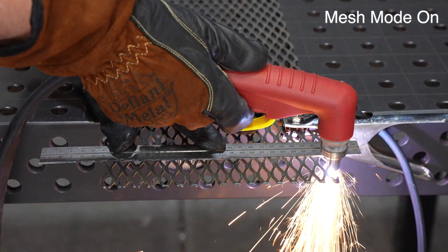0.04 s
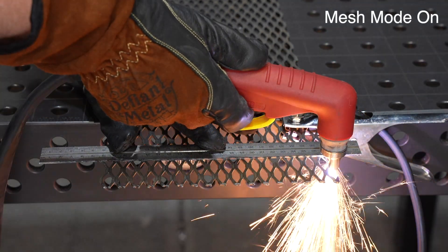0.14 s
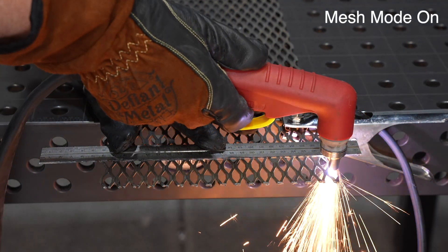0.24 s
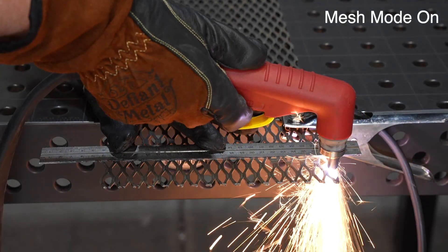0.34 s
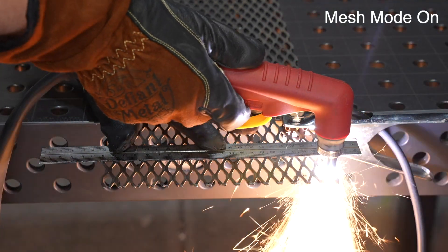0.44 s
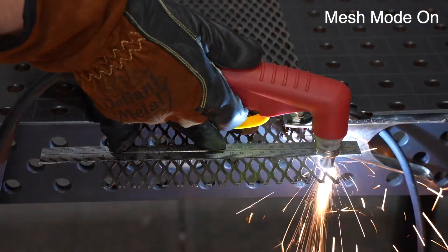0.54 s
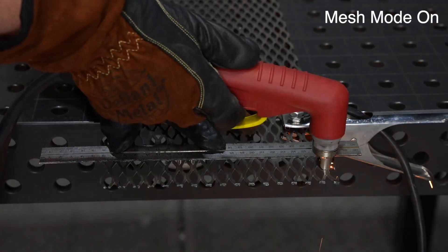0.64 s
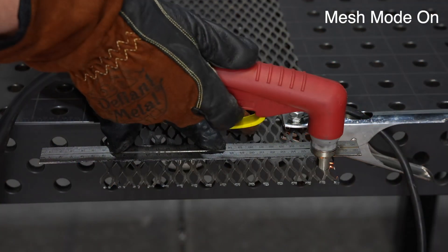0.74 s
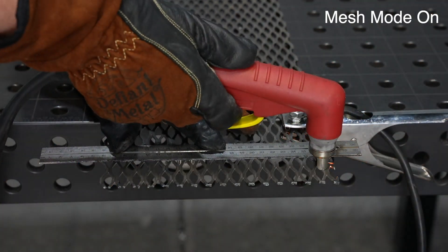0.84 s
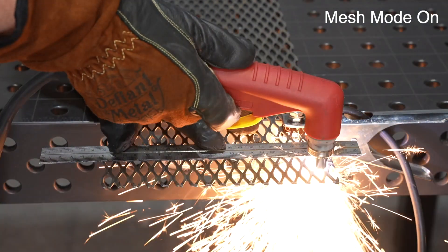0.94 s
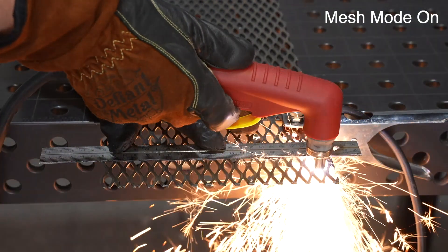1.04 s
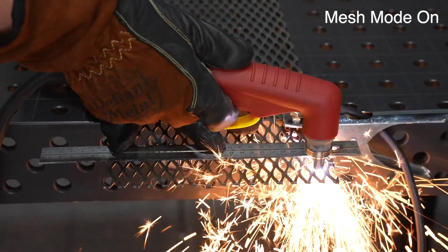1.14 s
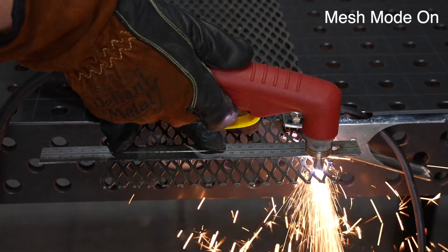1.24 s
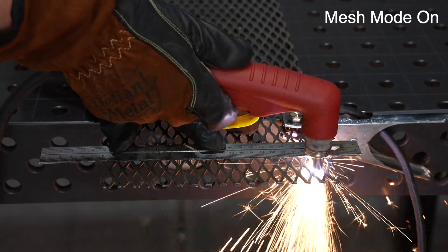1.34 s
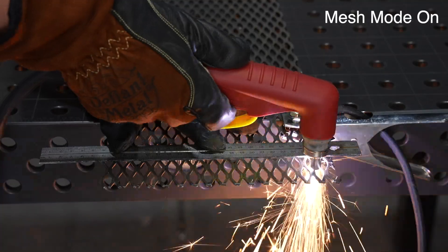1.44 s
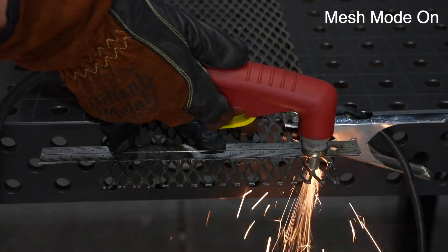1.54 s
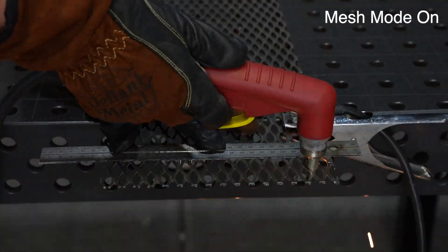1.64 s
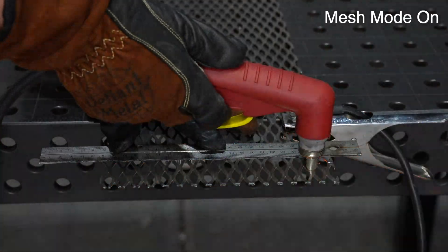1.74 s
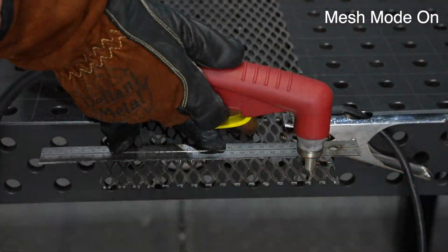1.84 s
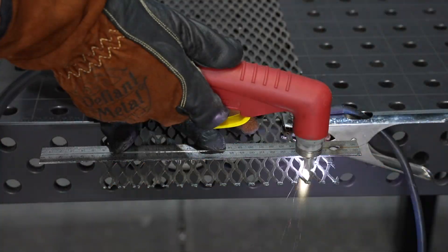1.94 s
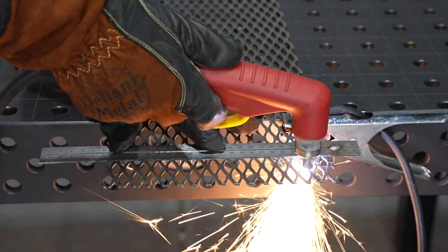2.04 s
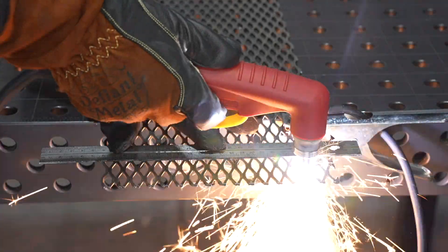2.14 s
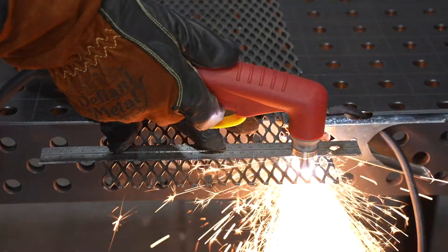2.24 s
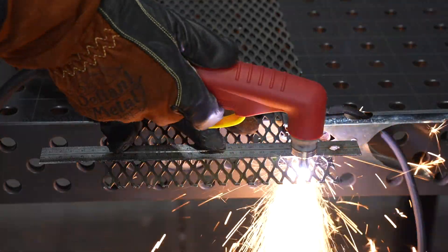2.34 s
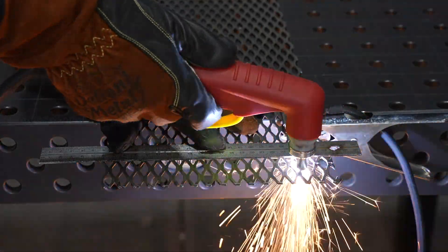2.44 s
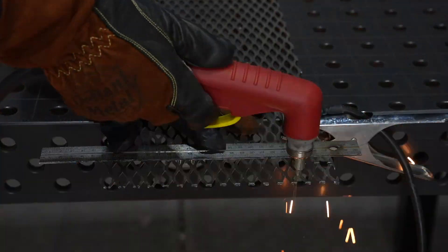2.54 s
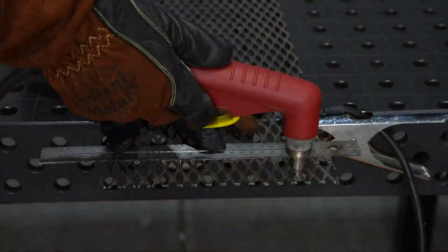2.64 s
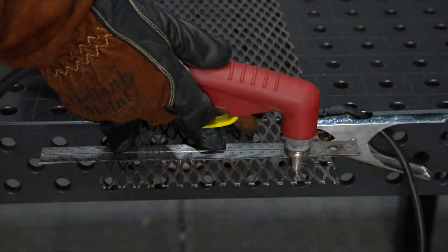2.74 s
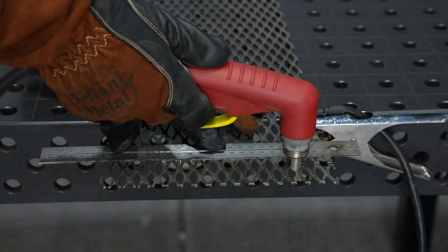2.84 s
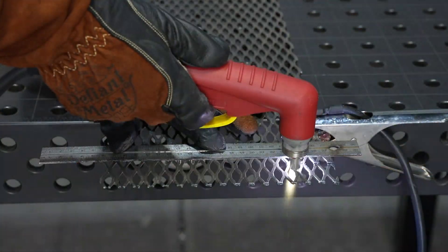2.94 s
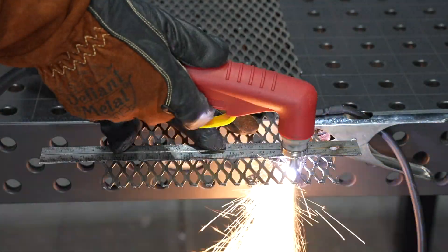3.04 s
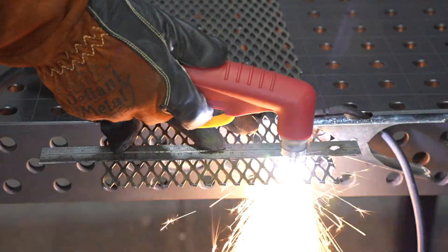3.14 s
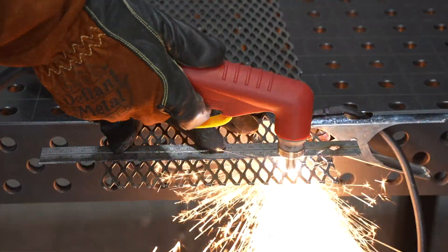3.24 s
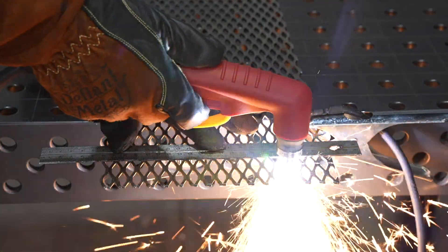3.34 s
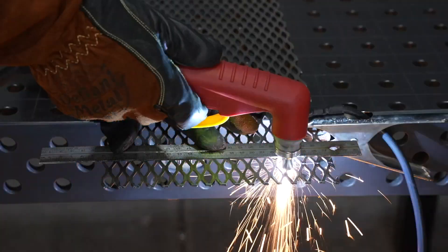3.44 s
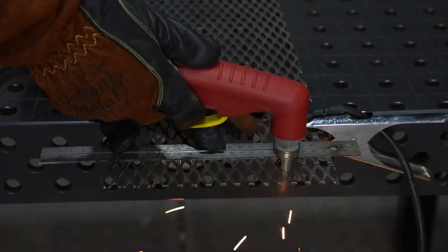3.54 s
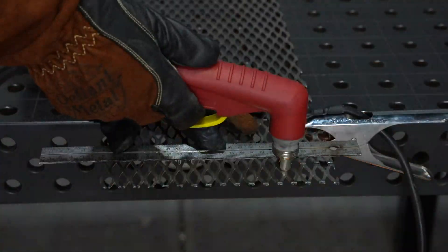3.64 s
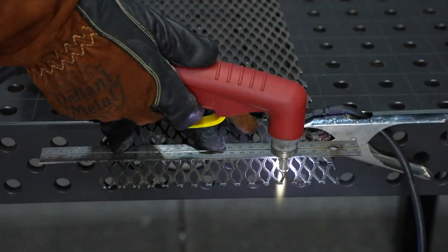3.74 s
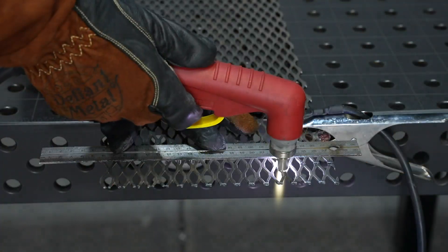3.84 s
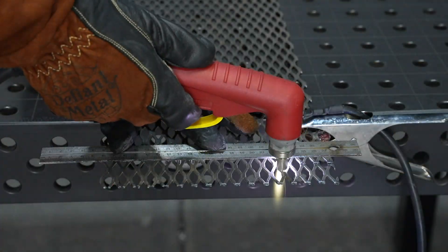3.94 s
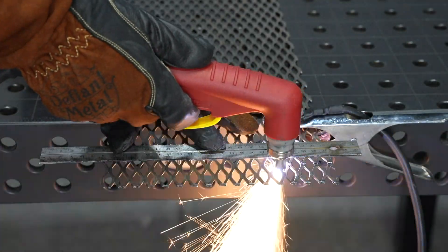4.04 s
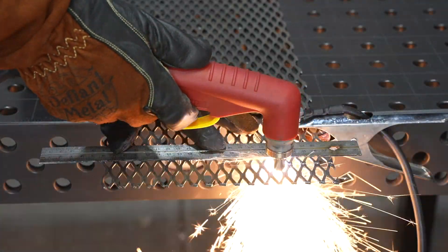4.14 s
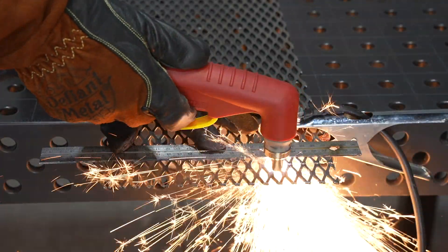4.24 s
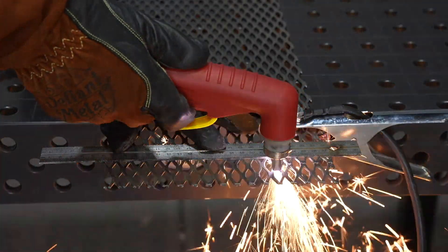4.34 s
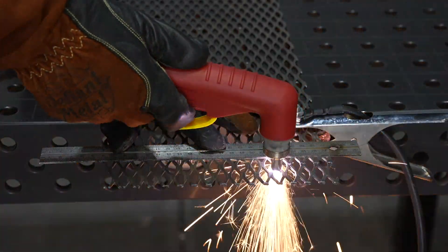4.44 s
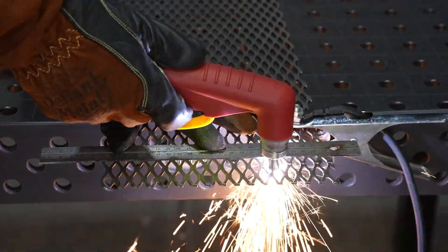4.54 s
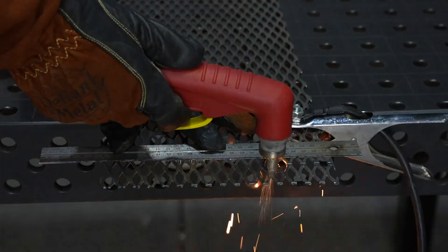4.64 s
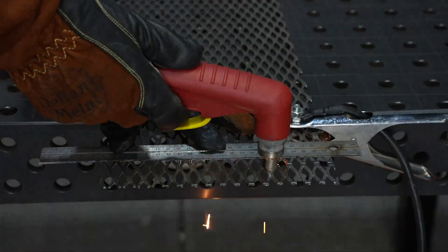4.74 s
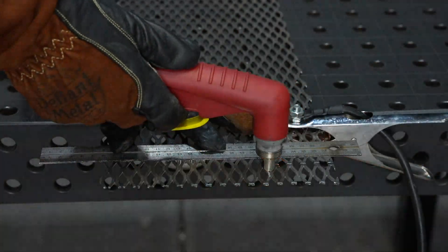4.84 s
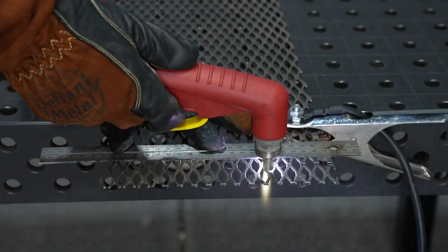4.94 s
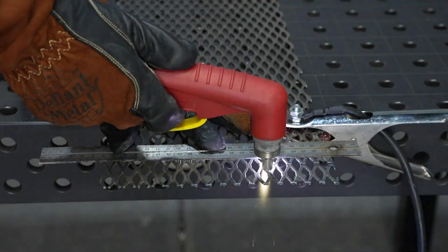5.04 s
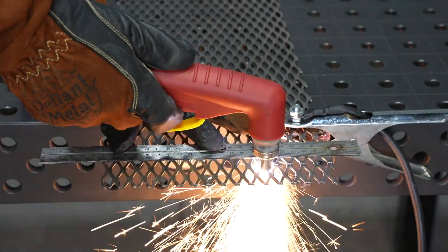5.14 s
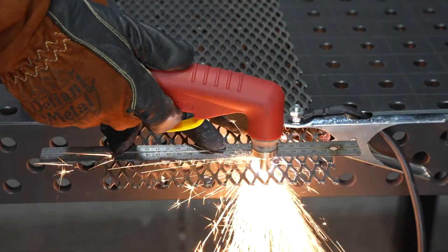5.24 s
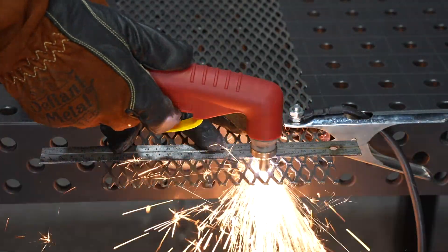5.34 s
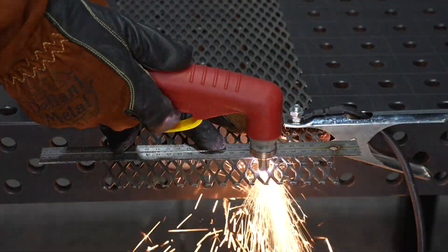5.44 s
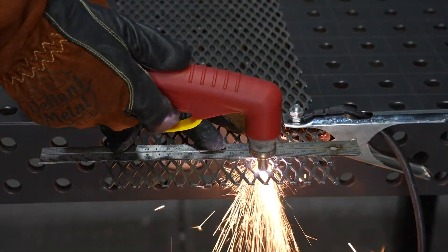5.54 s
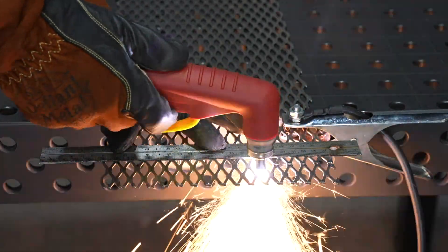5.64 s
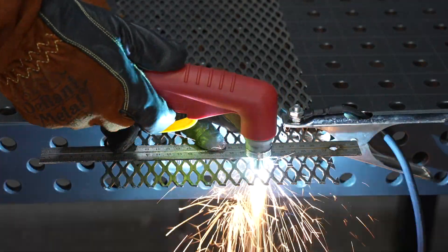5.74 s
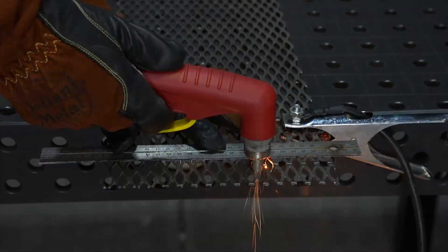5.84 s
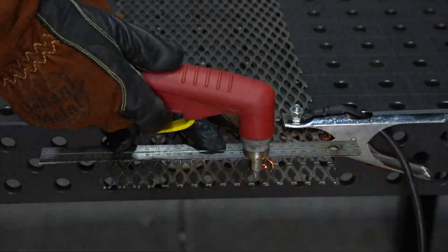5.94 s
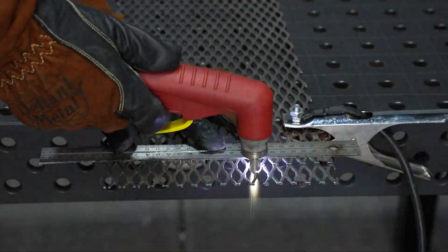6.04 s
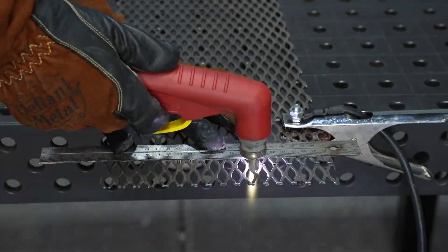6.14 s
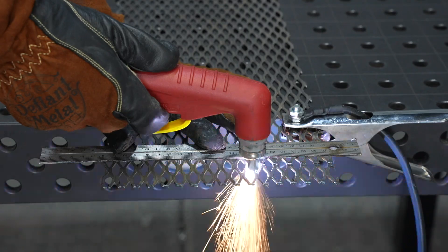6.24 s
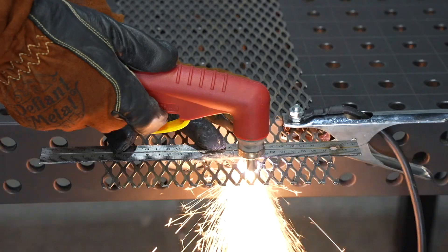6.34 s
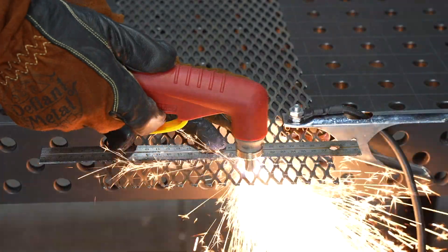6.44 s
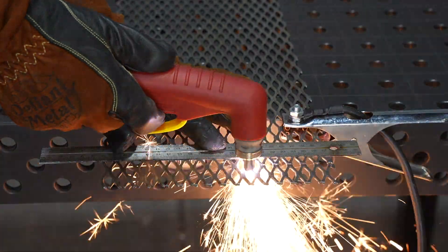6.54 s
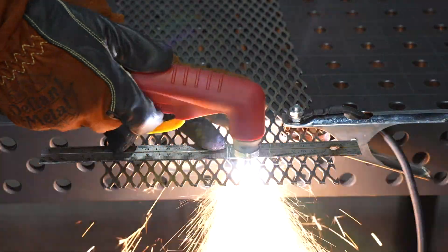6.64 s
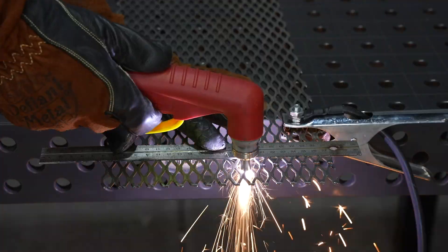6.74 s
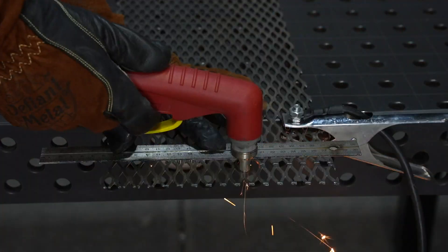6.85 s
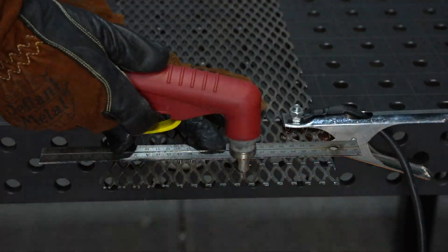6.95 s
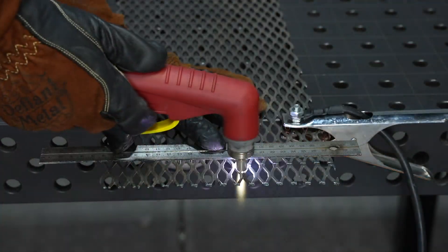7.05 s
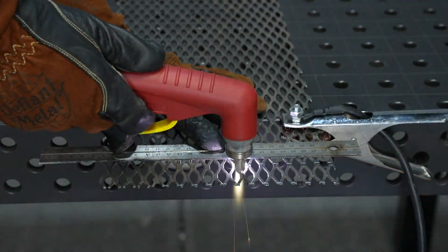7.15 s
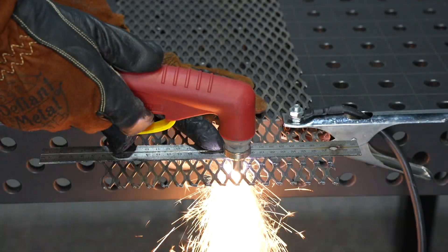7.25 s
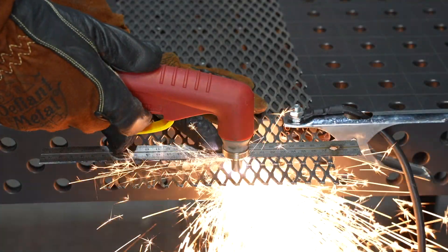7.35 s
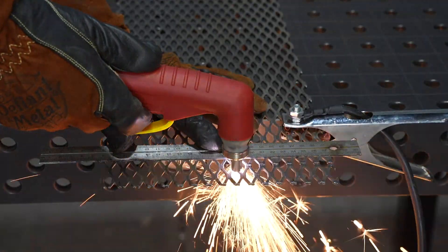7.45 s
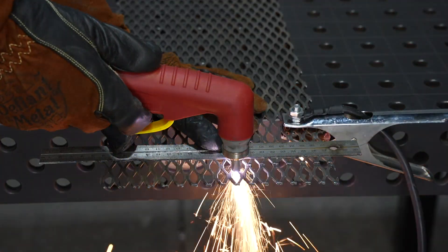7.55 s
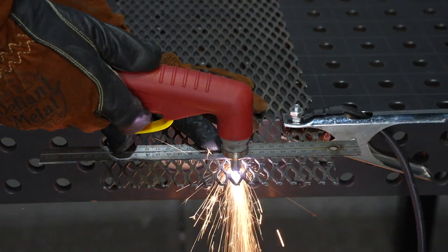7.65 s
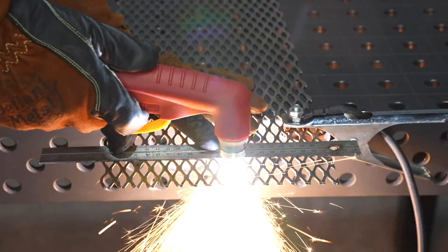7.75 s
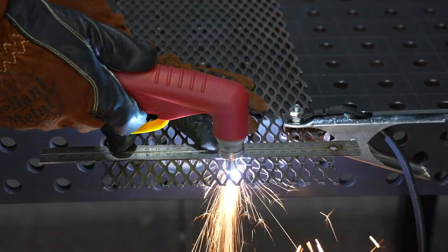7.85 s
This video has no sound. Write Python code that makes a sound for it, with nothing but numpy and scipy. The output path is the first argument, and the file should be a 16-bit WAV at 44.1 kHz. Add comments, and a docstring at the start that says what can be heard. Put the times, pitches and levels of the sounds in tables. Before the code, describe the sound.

A plasma torch already burning cuts expanded steel mesh, close to the microphone in a reverberant workshop. Its bright, breathy hiss breaks into coarse roars as it bites strands, flares and snaps out with a hard pop. The room rings for a moment, a soft low knock sounds, then a tick and pop relight the jet. This repeats roughly once a second over a faint fan and hum, ending mid-burn.

```python
"""A plasma torch, already lit, cuts expanded steel mesh in a reverberant workshop, close to a mono microphone.
Its arc is hissing noise with shifting resonances; it roars in bites, flares, then snaps out with a pop in a mesh gap.
The room rings on, a low knock comes from the power unit, then a tick and a pop as the arc relights; so it repeats,
and the last burn is still going at the end. Fan noise and a faint wavering hum run underneath throughout.
A fast limiter ducks whatever passes its ceiling, and the top of the treble is cut off."""
import sys
import numpy as np
from scipy import signal
from scipy.fft import rfft, irfft, next_fast_len
from scipy.io import wavfile
from scipy.ndimage import uniform_filter1d, minimum_filter1d

SR = 44100
rng = np.random.default_rng(int(sys.argv[2]) if len(sys.argv) > 2 else 0)


def file_out(sig):
    """Save sig as 16-bit WAV at sys.argv[1]."""
    # one column per channel
    cols = np.atleast_2d(sig).T
    # limit, then scale
    lim = np.clip(cols, -1, 1)
    pcm = np.round(lim * 32767).astype(np.int16)
    wavfile.write(sys.argv[1], SR, pcm)


N = 347678
T = np.arange(N) / SR  # s

# one row a burn; the jet's broad resonances change as the torch moves along the mesh. Columns:
# start_s, end_s, free_share (part of the burn before it meets steel), hiss_db (before trims),
# treble_tilt_db_per_octave, low_hz, low_db, middle_hz, middle_db, high_hz, high_db
BURNS = [(-.4, .6178, 0.39, -37, -.52, 2850, 6, 5530, 1.6, 7340, 2.2),
         (0.943, 1.602, 0.12, -36.5, -0.6, 2750, 5.2, 4520, .75, 8000, 0.99),
         (1.9422, 2.5746, 0.25, -36.5, -0.37, 2570, 3.8, 5200, 3.6, 8300, 3.1),
         (2.945, 3.5487, 0.25, -36.5, -0.42, 2540, 3.6, 5000, 2.5, 7840, 3),
         (3.7827, 4.6762, 0.38, -35.5, -0.36, 2160, 2.7, 4740, 1.8, 7580, 2.8),
         (4.949, 5.8236, 0.27, -35.5, -0.034, 1960, 2.5, 4410, 1, 7500, 3.1),
         (6.1176, 6.856, 0.34, -35.5, -0.5, 1898, 2.5, 5600, 1.57, 7500, 2.2),
         (7.118, 8.1, .21, -35, 0.0024, 1950, 2.6, 5650, 2.17, 8100, 1.2)]
# the arc bites a strand and throws molten steel: start_s, length_s, roar_db (before trims)
BITES = [(.14, .06, -45.5), (.23, .23, -49.5), (0.47, 0.11, -44.5), (1.19, .2, -48.5), (1.452, 0.18, -49),
         (2.177, 0.11, -43), (2.394, 0.15, -50.5), (3.185, 0.38, -46.5), (4.257, .27, -53.5),
         (4.56, 0.093, -48), (5.683, 0.09, -48), (6.455, .14, -55), (6.683, .13, -49), (7.345, .08, -51),
         (7.546, 0.17, -49.5), (7.795, 0.048, -39.5)]
# relative colours of the jet's hiss, its roar and its fizz in free air: frequency_hz, density_db
HISS_COLOUR = [(500, -46), (1000, -8), (1600, -2), (2200, -1.4), (3100, -1.06), (3800, -2), (5400, -2.5),
               (6300, -1.5), (9000, 0), (10800, -3.5), (12800, -5.5), (14700, -4), (15800, -6.5)]
ROAR_COLOUR = [(40, -38), (90, -30), (160, -15), (300, -10), (500, 0.5), (700, 3), (1150, 3), (1500, 0),
               (2500, -15.5), (6000, -32)]
FIZZ_COLOUR = [(1000, -30), (5000, -21), (8000, 4), (11000, -3), (15000, 1)]
# relative colour of the power unit's fan: frequency_hz, density_db
FAN_COLOUR = [(20, -26), (60, -22), (100, -15.5), (170, -7.5), (300, 2.5), (600, 3), (1000, -7.5),
              (2000, -28), (6000, -31), (16000, -47)]
# course of the power unit's hum, around which it wavers: time_s, pitch_hz, level_db
HUM_COURSE = [(0, 296, -88), (.5, 290.5, -62), (.95, 278.5, -61), (1.15, 285, -61), (1.35, 281, -70),
              (2.4, 287, -69), (3.2, 294.2, -63.5), (4.3, 296.2, -63.5), (7.8, 292.8, -67.5)]
# distinct reflections from bench, floor and walls: delay_s, level_db
ECHOES = [(.0049, -18.5), (0.0134, -16), (0.0204, -14), (.0275, -15), (0.0476, -17)]
# low standing waves of the room: pitch_hz, level_db, t60_s
STANDING_WAVES = [(97.9, -60.5, 1), (135, -79, 0.72), (194, -55, 0.57)]
# decay of the workshop's tail: frequency_hz, t60_s
TAIL_DECAY = [(100, 0.94), (400, 0.52), (1000, 0.96), (2500, 0.9), (5000, 0.99), (9000, .62), (15000, 0.55)]
# relative strength of that tail: frequency_hz, level_db
TAIL_COLOUR = [(100, -8), (400, -2.5), (1000, -1.5), (2500, -0.44), (6000, 0.5), (10000, -0.5),
               (15000, -2.5)]

# arc levels here are before the trims in arc() and scene()
PILOT_LEAD_S = .0048  # the pilot arc strikes this long before the main arc
BITE_EDGE_S = 0.015  # a bite starts and ends this gently
# roar of the jet in free air, and the gust on lighting, which settles
FREE_ROAR_DB, GUST_DB, GUST_S = -52, -47, 0.043
# the hiss sinks as the jet first meets steel: depth, half width
MEET_DB, MEET_S = -3, 0.036
# until then the free jet is louder and adds a fizz; the change is eased over the edge
FREE_DB, FIZZ_DB, MEET_EDGE_S = 0.72, -42, .035
# the arc clings to the far edge of the last strand and sags: time before it goes out, half width, hiss
SAG_LEAD_S, SAG_S, SAG_DB = 0.1, 0.027, -0.1
# then it stretches and flares until it snaps: length, rise, hiss, roar
FLARE_S, FLARE_RISE_S, FLARE_DB, FLARE_ROAR_DB = 0.039, 0.0094, 3, -44.5
# air rushes into the dead arc's channel: level, decay
PUFF_DB, PUFF_S = -38, 0.011
# the power unit knocks a fixed time before each relight
KNOCK_LEAD_S, KNOCK_DB = .1786, -32.5
EDGE_HZ = 15850  # top of the recorded band


def gain_of(db):
    """Turns decibels into gain."""
    return 10 ** (np.asarray(db) / 20)


def evened(x):
    """Scales to rms 1."""
    return x / np.sqrt(np.mean(x ** 2) + 1e-20)


def read(points, hz):
    """Reads a spectrum table on a log-frequency axis."""
    f, value = np.transpose(points)
    return np.interp(np.log(hz + 1), np.log(f + 1), value)


def add(mix, s, sound):
    """Adds a sound to the mix at time s."""
    part = mix[max(round(s * SR), 0):][:len(sound)]
    part += sound[:len(part)]


def noise(colour):
    """Noise of rms 1 whose spectrum in dB is the function colour(Hz)."""
    size = next_fast_len(N, True)
    spectrum = rfft(rng.standard_normal(size))
    spectrum = spectrum * gain_of(colour(np.fft.rfftfreq(size, 1 / SR)))
    return evened(irfft(spectrum, size)[:N])


def wander(rate_hz):
    """Random drift of rms 1, straight lines between random knots, two knots per cycle of rate_hz."""
    knots = np.arange(0, T[-1] + 1, .5 / rate_hz)
    return evened(np.interp(T, knots, rng.standard_normal(len(knots))))


def bump(x, centre, width):
    """A smooth hump of height 1, in a spectrum or in time."""
    return np.exp(-.5 * ((x - centre) / width) ** 2)


def step(t, s, edge_s):
    """A smooth rise from 0 to 1 around time s."""
    return .5 + .5 * np.tanh((t - s) / edge_s)


def jet_colour(hz, shift, burn, low_width_hz=440, middle_width_hz=260, high_width_hz=720,
               trough_ratio=0.56, trough_depth=0.41, trough_width_hz=240):
    """Hiss spectrum (dB) of one burn: three resonances moved by the factor shift, and a fixed trough below."""
    tilt, low_hz, low_db, middle_hz, middle_db, high_hz, high_db = burn
    colour_db = read(HISS_COLOUR, hz) + tilt * np.log2(np.maximum(hz, 3000))
    colour_db += low_db * bump(hz, low_hz * shift, low_width_hz)
    colour_db -= trough_depth * low_db * bump(hz, trough_ratio * low_hz, trough_width_hz)
    colour_db += middle_db * bump(hz, middle_hz * shift, middle_width_hz)
    return colour_db + high_db * bump(hz, high_hz * shift, high_width_hz)


def arc(sway=0.012, pilot_db=-12, rise_s=0.017, hiss_db=-0.46, roar_db=0.,
        flutter_db=0.83, drift_db=.5, sputter_db=1.5):
    """Turbulent jet: a weak pilot arc, a quick swell to full current, then an abrupt end and a puff of air."""
    hiss, roar, cutting = np.zeros(N), np.zeros(N), bites()
    fizz = gain_of(FIZZ_DB) * noise(lambda hz: read(FIZZ_COLOUR, hz))
    # the hand-held jet sways, and its resonances shift with it
    lean = np.pi / 4 * (1 + np.tanh(wander(5)))
    for on, off, free_share, jet_db, *burn in BURNS:
        lit = (T > on - PILOT_LEAD_S) & (T < off)
        t = T[lit]
        meets = on + free_share * (off - on)
        swell = 1 - np.exp(-np.maximum(t - on, 0) / rise_s)
        current = swell + gain_of(pilot_db) * (1 - swell)
        free = 1 - step(t, meets - MEET_S, MEET_EDGE_S)
        course_db, jet_roar = burn_course(t, on, meets, off)
        # crossfade between jets with lowered and raised resonances
        flat = noise(lambda hz: jet_colour(hz, 1 - sway, burn))[lit]
        sharp = noise(lambda hz: jet_colour(hz, 1 + sway, burn))[lit]
        jet = flat * np.cos(lean[lit]) + sharp * np.sin(lean[lit])
        jet = jet * gain_of(jet_db + course_db + FREE_DB * free)
        hiss[lit] = current * (jet + swell * free * fizz[lit])
        roar[lit] = current * np.sqrt(jet_roar + cutting[lit])
    # the arc root flutters and the hand drifts
    hiss *= gain_of(hiss_db + flutter_db * wander(150) + drift_db * wander(8.3))
    # molten steel leaves the cut in spurts
    sputter = gain_of(roar_db + sputter_db * wander(45))
    roar = (roar + puffs()) * sputter * noise(lambda hz: read(ROAR_COLOUR, hz))
    return hiss + roar


def burn_course(t, on, meets, off):
    """Hiss (dB) and roar (power) through one burn: a gust, a dip on meeting steel, a sag and a last flare."""
    flare = step(t, off - FLARE_S, FLARE_RISE_S)
    gust = np.exp(-np.maximum(t - on, 0) / GUST_S)
    dip_db = MEET_DB * bump(t, meets, MEET_S)
    sag_db = SAG_DB * bump(t, off - SAG_LEAD_S, SAG_S)
    roar_power = gain_of(FREE_ROAR_DB) ** 2 + gain_of(GUST_DB) ** 2 * gust
    roar_power = roar_power + gain_of(FLARE_ROAR_DB) ** 2 * flare
    return dip_db + sag_db + FLARE_DB * flare, roar_power


def bites():
    """Power of the roar from the strands being cut."""
    power = np.zeros(N)
    for s, length, db in BITES:
        span = step(T, s, BITE_EDGE_S) * (1 - step(T, s + length, BITE_EDGE_S))
        power += gain_of(db) ** 2 * span
    return power


def puffs():
    """Level of the short rush of air after each snap of the arc."""
    rush = sum((T >= off) * np.exp(-abs(T - off) / PUFF_S) for on, off, *_ in BURNS[:-1])
    return gain_of(PUFF_DB) * rush


def pop(rise_s, fall_s):
    """Pressure of a sudden change of gas volume: a sharp lobe, then a broader one of opposite sign."""
    t = np.arange(-SR // 500, SR // 100) / SR
    volume = np.exp(-np.logaddexp(0, t / rise_s) * rise_s / fall_s) / (1 + np.exp(-t / rise_s))
    pressure = np.gradient(volume)
    return t[0], pressure / pressure.max()


def pops(pilot_db=-32, light_db=-28.5, out_db=-20, low_cut_hz=140):
    """Gas expands with a tick as the pilot strikes and a pop as the arc lights; it collapses as the arc dies."""
    out = np.zeros(N)
    lead, tick = pop(rise_s=.00003, fall_s=0.00017)
    lead, expand = pop(rise_s=0.00013, fall_s=0.00053)
    lead, collapse = pop(rise_s=.00018, fall_s=0.00031)
    for on, *_ in BURNS[1:]:
        add(out, on + lead - PILOT_LEAD_S, gain_of(pilot_db) * tick)
        add(out, on + lead, gain_of(light_db) * expand)
    for on, off, *_ in BURNS[:-1]:
        add(out, off + lead, -gain_of(out_db) * collapse)
    return signal.sosfilt(signal.butter(1, low_cut_hz, "high", fs=SR, output="sos"), out)


def knocks(pitch_hz=345, half_width_s=0.0018):
    """A dull knock of a few cycles before each relight, likely a valve switching in the power unit."""
    out, t = np.zeros(N), np.arange(-SR // 80, SR // 80) / SR
    knock = gain_of(KNOCK_DB) * bump(t, 0, half_width_s) * np.cos(2 * np.pi * pitch_hz * t)
    for on, *_ in BURNS[1:]:
        add(out, on - KNOCK_LEAD_S + t[0], knock)
    return out


def power_unit(fan_db=-58.0, waver_db=2):
    """Steady fan noise and one faint hum, a sine that wavers in level and phase."""
    s, hz, level_db = np.transpose(HUM_COURSE)
    turns = np.cumsum(np.interp(T, s, hz)) / SR
    hum_gain = gain_of(np.interp(T, s, level_db) + waver_db * wander(4.9))
    hum = hum_gain * np.sin(2 * np.pi * turns + .5 * wander(1.9))
    fan = gain_of(fan_db) * noise(lambda hz: read(FAN_COLOUR, hz))
    return fan + hum


def workshop(x, wet_db, build_s=0.019):
    """Direct sound, a few echoes, standing waves and a dense tail that builds up and dies band by band."""
    t = np.arange(SR) / SR
    building = rng.standard_normal(SR) * (1 - np.exp(-t / build_s))
    hz, frame_s, bands = signal.stft(building, SR, nperseg=256)
    decay = gain_of(-60 * frame_s / read(TAIL_DECAY, hz)[:, None])
    colour = gain_of(read(TAIL_COLOUR, hz))[:, None]
    tail = signal.istft(bands * decay * colour, SR, nperseg=256)[1][:SR]
    response = gain_of(wet_db) * tail / np.linalg.norm(tail)
    for pitch_hz, db, t60 in STANDING_WAVES:
        response += gain_of(db - 60 * t / t60) * np.sin(2 * np.pi * pitch_hz * t)
    response[0] += 1  # direct sound
    for delay, db in ECHOES:
        add(response, delay, gain_of(db) * np.array([.2, .6, .2]))  # slightly blurred
    # circular, so the room is already ringing at the start
    return irfft(rfft(x) * rfft(response, N), N)


def scene(arc_db=-2.0):
    """Torch and knocks ring in the workshop, the power unit's drone is added dry; both channels are alike."""
    torch = workshop(gain_of(arc_db) * arc(), wet_db=-2) + workshop(pops(), wet_db=-0.5)
    mix = torch + workshop(knocks(), wet_db=-1.0) + power_unit()
    return np.array([mix, mix])


def record(dry, ceiling_db=-27.0, recovery_db_per_s=130):
    """A fast look-ahead limiter on the microphone signal, then a steep low-pass at the top of the band."""
    power = abs(uniform_filter1d((dry ** 2).mean(0), size=20))
    over_db = np.maximum(10 * np.log10(power + 1e-12) - ceiling_db, 0)
    # hold each peak and let it recover in a straight line of dB
    fall = T * recovery_db_per_s
    held_db = np.maximum.accumulate(over_db + fall) - fall
    # start ducking just ahead of the peak
    duck_db = uniform_filter1d(minimum_filter1d(-held_db, size=120), size=120)
    low_pass = signal.firwin(511, EDGE_HZ, window=("kaiser", 9), fs=SR)
    return signal.oaconvolve(dry * gain_of(duck_db), low_pass[None], "same")


dry = scene()
out = record(dry)
file_out(out)
```